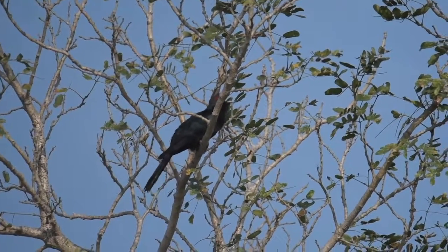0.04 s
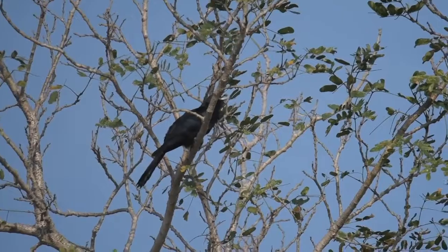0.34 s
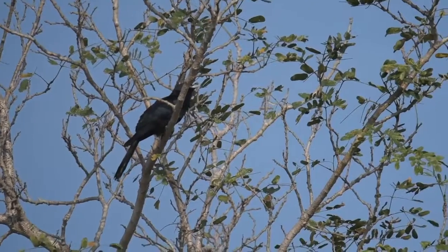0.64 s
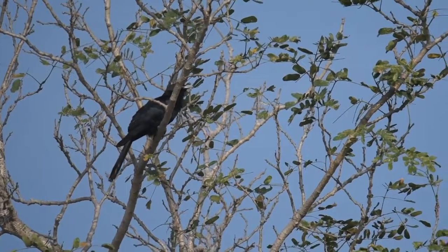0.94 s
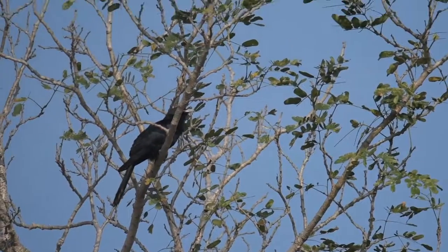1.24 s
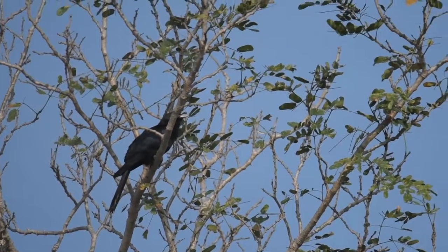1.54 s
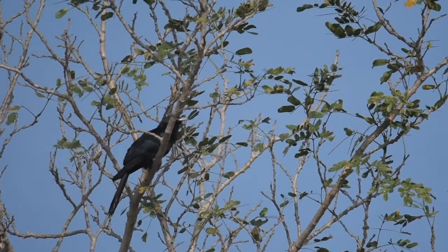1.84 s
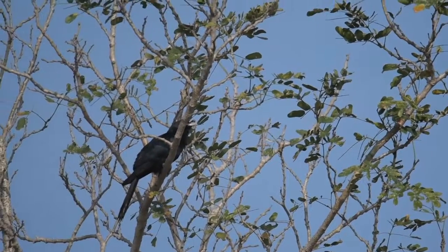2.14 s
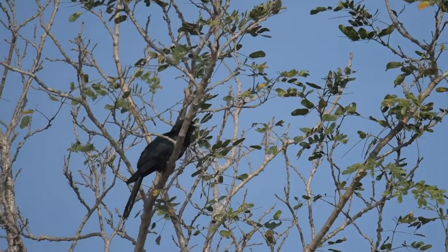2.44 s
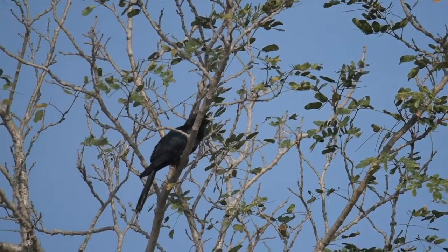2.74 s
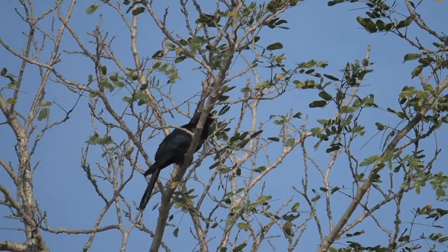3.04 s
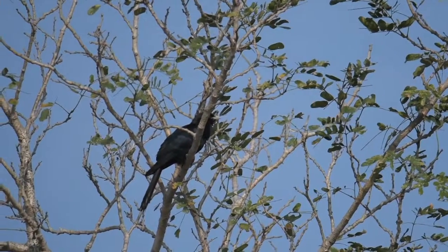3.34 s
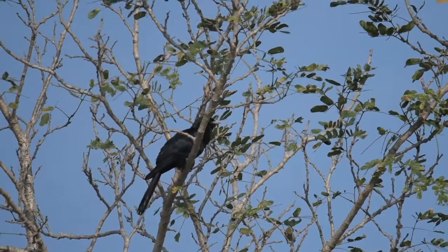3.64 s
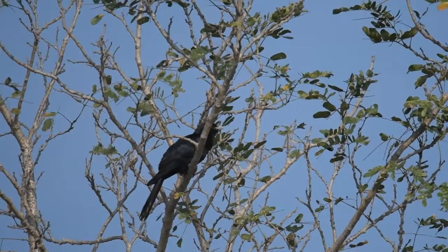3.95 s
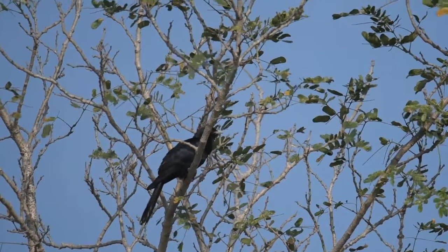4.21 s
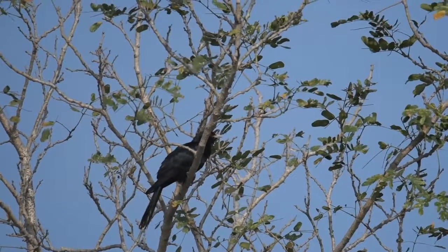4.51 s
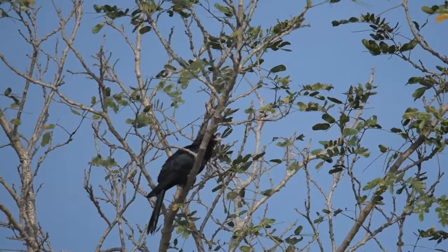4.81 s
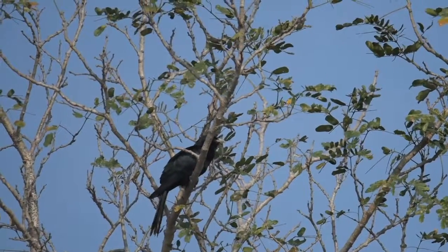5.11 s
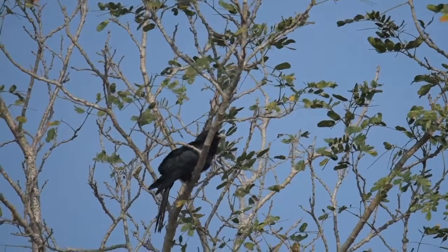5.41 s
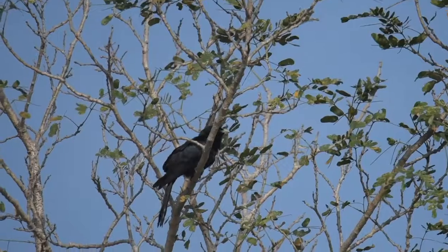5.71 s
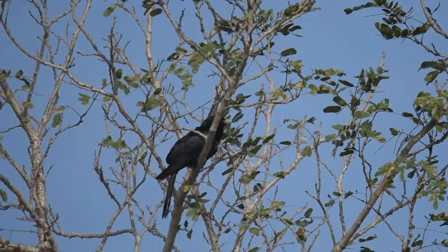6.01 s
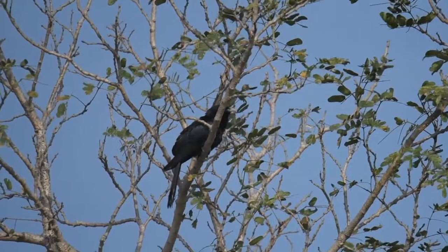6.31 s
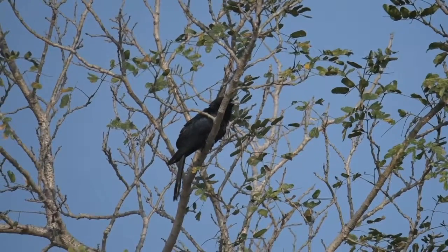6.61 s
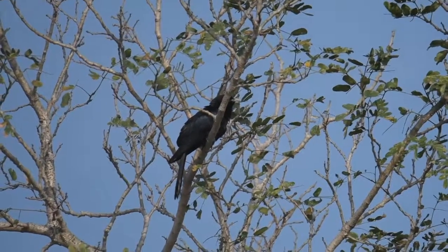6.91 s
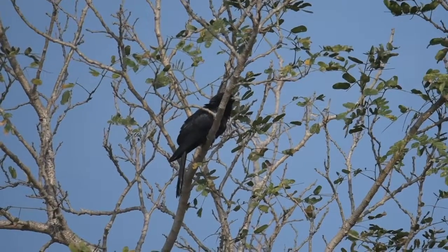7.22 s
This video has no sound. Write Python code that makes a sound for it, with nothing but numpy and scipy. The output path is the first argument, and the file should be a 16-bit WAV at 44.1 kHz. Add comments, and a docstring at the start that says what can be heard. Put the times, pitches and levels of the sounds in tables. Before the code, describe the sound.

A koel gives a single loud rising and falling whistle outdoors, then small birds chirp faintly over distant traffic and softly rushing leaves.

```python
"""A koel in a treetop ends its call with one loud whistle that arches up and falls; walls and trees
throw it back. As the tail dies away, small birds farther off pipe, rasp and chip, with a cluster of
slurs and ticks near the middle. Under it all a distant engine hums, swelling and sinking until it
fades near the end, over steady traffic rumble and a soft rush of leaves.
Throughout, the camera adds a faint hiss and cuts two narrow notches in the sound."""
import sys
import numpy as np
from scipy import signal
from scipy.fft import rfft, irfft, next_fast_len
from scipy.io import wavfile
from scipy.ndimage import uniform_filter1d, map_coordinates

SR = 44100
rng = np.random.default_rng(int(sys.argv[2]) if len(sys.argv) > 2 else 0)


def store_pcm(level_fs):
    """Save levels as 16-bit WAV."""
    pcm = np.round(np.clip(level_fs, -1, 1) * 32767).astype(np.int16)
    wavfile.write(sys.argv[1], SR, np.atleast_2d(pcm).T)


N = 328986
LEAD = SR // 5  # samples of pre-roll, so the echoes already ring at time zero


def amp(db):
    """Decibels to gain."""
    return 10 ** (np.asarray(db) / 20)


def unit(x):
    """Scale to rms 1."""
    return x / np.sqrt(np.mean(x ** 2) + 1e-20)


def pan(db):
    """Left and right gains for a level difference; positive is left."""
    return amp([[db / 2], [-db / 2]])


def along(points, hz):
    """Read a curve of (frequency [Hz], value) points on a log axis."""
    freqs, values = np.transpose(points)
    return np.interp(np.log(hz + 1), np.log(freqs + 1), values)


def clock():
    """The time of each sample in seconds, pre-roll included."""
    return np.arange(-LEAD, N) / SR


def curves(rows):
    """One automation curve for each column after the time."""
    times, *columns = np.transpose(rows)
    return [np.interp(clock(), times, column) for column in columns]


def held(db, end_s, release_db_per_s):
    """An envelope in dB that holds, then drops steadily."""
    return db - release_db_per_s * np.maximum(clock() - end_s, 0)


def wobble(rate):
    """A smooth random curve, rate knots a second."""
    n = N + LEAD
    knots = rng.standard_normal(int(n * rate / SR) + 4)
    return map_coordinates(knots, [np.arange(n) * rate / SR])


def filtered(x, response):
    """Equalise x with a gain given as a function of frequency."""
    size = next_fast_len(x.shape[-1] + SR // 4)
    gain = response(np.fft.rfftfreq(size, 1 / SR))
    return irfft(rfft(x, size) * gain, size)[..., :x.shape[-1]]


def lagged(pair, lag_s):
    """Sound from the right reaches the left microphone later."""
    return filtered(pair, lambda hz: np.exp(1j * np.pi * hz * lag_s * np.array([[-1], [1]])))


def rush(spectrum):
    """Stereo noise of rms 1, nearly mono in the bass and wide in the treble."""
    # how alike the two channels are (frequency [Hz], correlation [0-1])
    likeness = [(60, 0.99), (170, 0.91), (350, 0.85), (700, 0.6), (1400, 0.11), (3000, 0.0034)]

    def mid_side_gains(hz):
        angle = np.arccos(np.clip(along(likeness, hz), -1, 1)) / 2
        return amp(along(spectrum, hz)) * [np.cos(angle), np.sin(angle)]

    mid, side = filtered(rng.standard_normal((2, N + LEAD)), mid_side_gains)
    return unit(np.array([mid + side, mid - side]))


def burst(peak_s, spread_s, centre_hz, width_hz):
    """A bell-shaped swell of narrow stereo noise, about rms 1 at its peak."""
    out, t = np.zeros((2, N + LEAD)), clock()
    on = np.abs(t - peak_s) < np.pi * spread_s
    noise = rng.standard_normal((2, on.sum()))
    band = filtered(noise, lambda hz: np.exp(-.5 * ((hz - centre_hz) / width_hz) ** 2))
    out[:, on] = unit(band) * np.exp(-.5 * ((t[on] - peak_s) / spread_s) ** 2)
    return out


def scatter(x, decay, build_s):
    """Foliage reverb: it builds up, then dies as decay sets out (frequency [Hz], t60 [s])."""
    hz, t, noise = signal.stft(rng.standard_normal((2, 2 * SR)), SR, nperseg=256)
    envelope = amp(-60 * t / along(decay, hz)[:, None]) * (1 - np.exp(-t / build_s))
    tail = signal.istft(noise * envelope, SR, nperseg=256)[1]
    tail /= np.sqrt(2 * SR * np.mean(envelope[0] ** 2))
    return signal.fftconvolve(x[None], tail, axes=1)[:, :len(x)]


def background(traffic_db=-55, leaves_db=-64, hiss_db=-68):
    """The bed: steady traffic rumble, the soft rush of leaves and the microphones' own hiss."""
    # the colour of each noise (frequency [Hz], relative density [dB])
    traffic_colour = [(16, -57), (28, -14), (54, -6), (86, -2), (139, -4), (156, -11.5), (189, -6.5),
                      (292, -9), (322, -8.5), (348, -15.5), (480, -13), (706, -18.5), (1300, -23.5),
                      (1690, -32), (2860, -120)]
    leaf_colour = [(400, -5), (1100, 5.5), (2100, 3), (3200, -1.5), (4200, -3), (6300, -5), (8500, -36),
                   (15000, -41)]
    hiss_colour = [(500, -14), (4000, 3.5), (9000, 2), (12000, 2.5), (15700, -3.5)]
    traffic = pan(-0.73) * amp(traffic_db + 0.71 * wobble(7)) * lagged(rush(traffic_colour), .0001)
    leaves = pan(-5) * amp(leaves_db + 0.13 * wobble(3.26)) * rush(leaf_colour)
    return traffic + leaves + amp(hiss_db) * rush(hiss_colour)


def engine(firing_hz=94.06, firing_trim_db=-4, drift=0.013):
    """A far engine hums at its firing rate and the octave, each fading in and out on its own."""
    # fader moves (time [s], firing tone before its trim [dB], octave [dB])
    fades = [(0, -50, -67), (.8, -47, -69.5), (1.15, -53, -59), (1.8, -63, -71), (3.1, -55.5, -65.5),
             (3.85, -62, -59), (4.2, -53, -65.5), (4.7, -60, -70), (5.75, -59, -62), (6.35, -53.5, -76),
             (6.7, -71, -73), (7.46, -81, -62)]
    firing_db, octave_db = curves(fades)
    phase = 2 * np.pi * np.cumsum(firing_hz * (1 + drift * wobble(9))) / SR
    firing = amp(firing_db + firing_trim_db + 0.9 * wobble(4.43)) * np.sin(phase)
    octave = amp(octave_db + 3.5 * wobble(7)) * np.sin(2 * phase)
    return np.sqrt(2) * pan(-0.67) * (firing + octave)


def rasps(trim_db=-1):
    """Hoarse calls and rustles, blurred by distance into swells of noise."""
    # (peak time [s], spread [s], centre [Hz], width [Hz], level before the trim [dB])
    swells = [(0.701, 0.074, 6100, 500, -70.5), (0.854, 0.029, 9100, 2600, -59.5),
              (0.943, 0.13, 6686, 2010, -65), (1.127, 0.056, 2090, 262.3, -54.5),
              (3.947, 0.055, 5000, 550, -64.5), (4.05, 0.072, 6360, 900, -63.5),
              (4.458, 0.071, 3080, 330, -62.5), (6.005, 0.052, 3640, 350, -64.5),
              (6.187, 0.026, 1870, 160, -59.5), (6.4, 0.1, 3200, 280, -67),
              (7.233, 0.085, 3500, 420, -65.5)]
    return pan(-2) * sum(amp(db + trim_db) * burst(*shape) for *shape, db in swells)


def chips(spread_s=.007, width_hz=160, wet_db=-12):
    """A small bird scolds with short, nearly dry notes."""
    # (peak time [s], pitch [Hz], level [dB])
    scolds = [(2.012, 2190, -59), (2.034, 2010, -56), (2.27, 2070, -52), (2.775, 2070, -55.5),
              (5.318, 1900, -62), (5.472, 1930, -55), (6.05, 2100, -55.5), (6.392, 2060, -56.5),
              (6.542, 1830, -57), (6.63, 2130, -61.5)]
    direct = sum(amp(db) * burst(s, spread_s, hz, width_hz) for s, hz, db in scolds)
    tail = scatter(direct[0], [(2000, 0.34)], build_s=0.011)
    return pan(-6) * (direct + amp(wet_db) * tail)


def chatter(count=26, centre_hz=3500, range_octaves=.7, quietest_db=-76.5, wet=.8):
    """Notes of the farthest birds, at random moments and pitches; longer ones are louder."""
    notes = []
    for when, size, start, middle, end in rng.uniform(size=(count, 5)):
        hz = centre_hz * 2 ** (range_octaves * (middle - .5))
        bend = hz * (1 + .2 * (np.array([start, .5, end]) - .5))
        notes.append((when * N / SR, .05 * (1 + size), bend, quietest_db + 3 * size, wet))
    return notes


def pipes(sag_hz=59.4, wet=0.548):
    """Notes of far birds piping on a nearly level pitch."""
    # (time [s], length [s], pitch [Hz], level [dB])
    whistles = [(.79, 0.057, 4960, -69.5), (1.038, 0.086, 4930, -68.5), (1.641, .23, 4430, -72.5),
                (2.14, .16, 3590, -74), (2.401, 0.066, 3450, -69), (3.859, 0.063, 4540, -70),
                (4.28, 0.13, 3640, -72), (5.068, 0.047, 2850, -69), (5.101, 0.028, 3260, -66.5),
                (6.173, 0.12, 2340, -62.5), (6.868, 0.15, 4340, -73), (6.94, .13, 3270, -69),
                (7.171, 0.14, 3195, -70)]
    return [(s, length, (hz + sag_hz / 2, hz, hz - sag_hz / 2), db, wet)
            for s, length, hz, db in whistles]


def slurs(length_s=.06, bend_hz=(3595, 2938, 2850), echo_s=.047, echo_db=-15, wet=.45):
    """Notes of a songbird slurring downward; each comes back once as an echo."""
    # (time [s], level [dB])
    calls = [(2.47, -66), (2.689, -60), (3.459, -63), (3.663, -60)]
    notes = []
    for s, db in calls:
        notes.append((s, length_s, bend_hz, db, wet))
        notes.append((s + echo_s, length_s, bend_hz, db + echo_db, wet))
    return notes


def ticks(tick_s=.018, tick_hz=(6850, 5770, 4950), arch_s=.044, wet=0.076):
    """Notes of a nearer bird's two-part call: a steep tick, then a small arch."""
    # (time [s], tick level [dB], arch delay [s], arch top [Hz], arch rise [Hz], arch level [dB])
    calls = [(2.601, -65, 0.029, 5000, 450, -66), (2.763, -66, .011, 5040, 220, -63.5),
             (2.924, -70, .029, 5300, 1000, -62)]
    notes = []
    for s, tick_db, delay, top, rise, arch_db in calls:
        notes.append((s, tick_s, tick_hz, tick_db, wet))
        notes.append((s + delay, arch_s, (top - rise, top, top - rise), arch_db, wet))
    return notes


def songbirds(flutter_db=3):
    """Each note is a fluttering whistle bent through three pitches; far ones are wetter and waver more."""
    t = clock()
    direct, send = np.zeros((2, len(t)))
    waver = .045 * wobble(500)
    flutter = flutter_db * wobble(110)
    for start, length, bend_hz, db, wet in slurs() + ticks() + pipes() + chatter():
        on = (t > start) & (t < start + length)
        progress = (t[on] - start) / length
        contour = np.polyval(np.polyfit([0, .5, 1], bend_hz, 2), progress)
        pitch = contour * (1 + wet * waver[on])
        envelope = amp(db + flutter[on]) * np.sqrt(2 * np.abs(np.sin(np.pi * progress)))
        note = envelope * np.sin(2 * np.pi * np.cumsum(pitch) / SR)
        direct[on] += np.sqrt(1 - wet) * note
        send[on] += np.sqrt(wet) * note
    return pan(-3) * (direct + scatter(send, [(2500, 0.23), (6000, 1.0)], build_s=0.0022))


def treetop_echoes(voice, crown_db=-3, grove_db=-0.54):
    """The koel as it arrives: direct sound, slaps off walls, and the wash of its own tree and the grove."""
    # where the direct sound sits (frequency [Hz], left minus right [dB])
    bearing = [(1400, -9.5), (7000, -10.5), (8800, 6)]
    # what all reflections keep (frequency [Hz], gain [dB])
    dulling = [(1650, -2), (3000, -9.5), (6000, -13), (12000, -17)]
    # the walls return little of the lowest pitches (frequency [Hz], gain [dB])
    wall_colour = [(1270, -18), (1350, -5), (1420, 0), (1600, -3.5)]
    # wall slaps; the bird faces away, so one is louder than the direct tone, though duller
    # (delay [s], gain [dB], left minus right [dB])
    slaps = [(0.014, 0.5, 6.5), (0.035, -13, -2), (0.0475, 12, -9.5), (0.055, -11, -14.5)]
    # how long the grove rings (frequency [Hz], t60 [s])
    grove_decay = [(1200, 1.55), (1550, 2.25), (3000, 2.46), (6000, 0.99), (12000, .4)]
    direct = filtered(voice, lambda hz: amp(along(bearing, hz) / 2 * np.array([[1], [-1]])))
    dull = filtered(voice, lambda hz: amp(along(dulling, hz)))
    thrown = filtered(dull, lambda hz: amp(along(wall_colour, hz)))
    walls = sum(amp(db) * pan(side) * np.roll(thrown, round(delay * SR)) for delay, db, side in slaps)
    crown = amp(crown_db) * scatter(dull, [(1400, 0.34), (8000, 0.77)], build_s=0.034)
    grove = amp(grove_db) * scatter(dull, grove_decay, build_s=0.019)
    return lagged(direct + walls, .00013) + pan(-6) * (crown + grove)


def koel(swell_s=0.12, push_s=0.042, release_at_s=0.3508, jitter=0.0017, fall_jitter=.012):
    """A nearly pure syrinx tone with thin, flickering overtones: it swells, holds, pushes and collapses."""
    # the whistle: level, arching up, then falling (time [s], pitch [Hz])
    melody = [(-.12, 1358), (-.045, 1372), (-.015, 1381), (.035, 1368), (.1, 1408), (.16, 1508),
              (.215, 1610), (.26, 1586), (.3, 1508), (.34, 1348), (.372, 1247), (.4, 1086)]
    # how throat and beak colour the overtones (frequency [Hz], gain [dB])
    throat = [(2700, -17.5), (3200, -8.5), (4100, -13), (4800, -1), (5500, 1), (6900, 1), (8200, -8),
              (10000, -9.5), (12500, -13), (15000, -32)]
    t = clock()
    pitch = uniform_filter1d(curves(melody)[0], size=700)
    swell_db = 5 * np.clip(t / swell_s - 1, -1, 0)
    push_db = 3.5 * np.clip(1 + (t - release_at_s) / push_s, 0, 1)
    strain_db = np.interp(pitch, (1570, 1607), (0, 4))  # the top of the arch is brighter
    tone_db = held(-36, release_at_s, release_db_per_s=520) + swell_db + push_db
    overtone_db = held(-57, end_s=0.358, release_db_per_s=600) + strain_db
    # the pitch grows unsteady as the note collapses
    slope = np.gradient(pitch)
    falling = np.clip(-slope / np.abs(slope).max(), 0, 1)
    pitch = pitch * (1 + (jitter + fall_jitter * falling) * wobble(260))
    phase = 2 * np.pi * np.cumsum(pitch) / SR
    overtones = sum(amp(along(throat, k * pitch) + 3.5 * wobble(50)) * np.sin(k * phase)
                    for k in range(2, 11))
    voice = amp(tone_db) * np.sin(phase) + amp(overtone_db) * overtones
    singing = (t > melody[0][0]) & (t < melody[-1][0])
    return np.sqrt(2) * voice * singing


def scene(fade_in_s=.006):
    """All the birds over the engine and the outdoor bed."""
    mix = treetop_echoes(koel()) + songbirds() + chips() + rasps() + engine() + background()
    fade_in = np.clip(clock() / fade_in_s, 0, 1)
    return (fade_in * mix)[:, LEAD:]


def record(dry):
    """The camera cuts two narrow bands and keeps nothing above its band limit."""
    # dips in its response (centre [Hz], width [Hz])
    notches = [(2620, 305), (7700, 670)]
    top_hz = 15750

    def response(hz):
        dips = [1 - np.exp(-(2 * (hz - centre) / width) ** 2) for centre, width in notches]
        return np.prod(dips, axis=0) * (hz < top_hz)

    return filtered(dry, response)


dry = scene()
out = record(dry)
store_pcm(out)
```